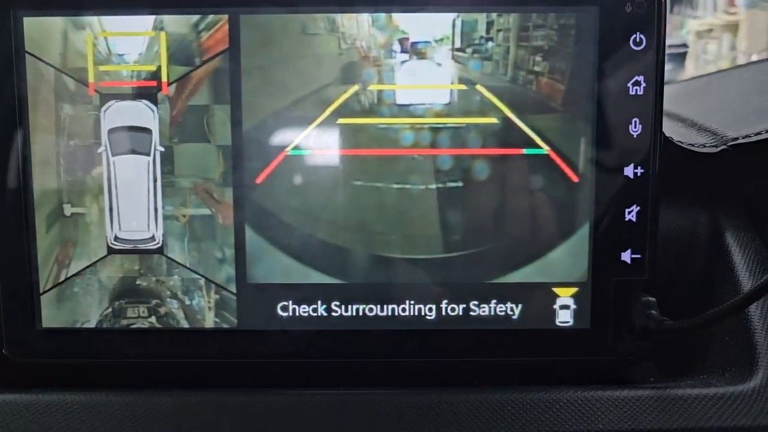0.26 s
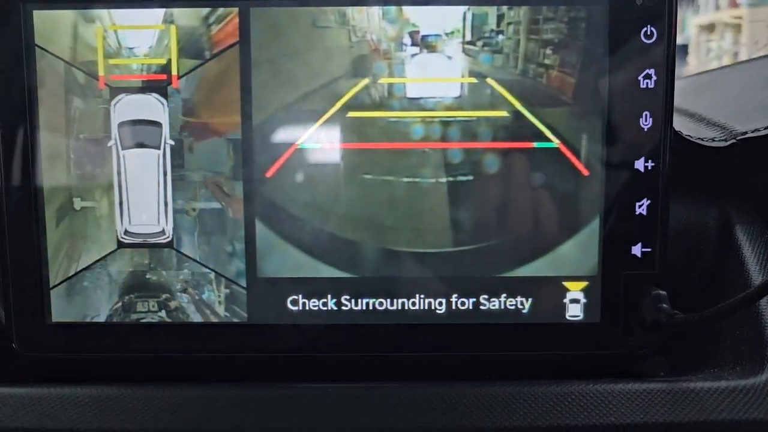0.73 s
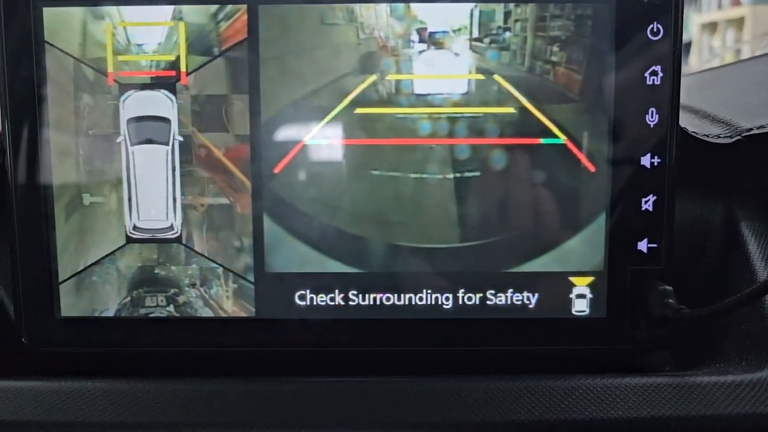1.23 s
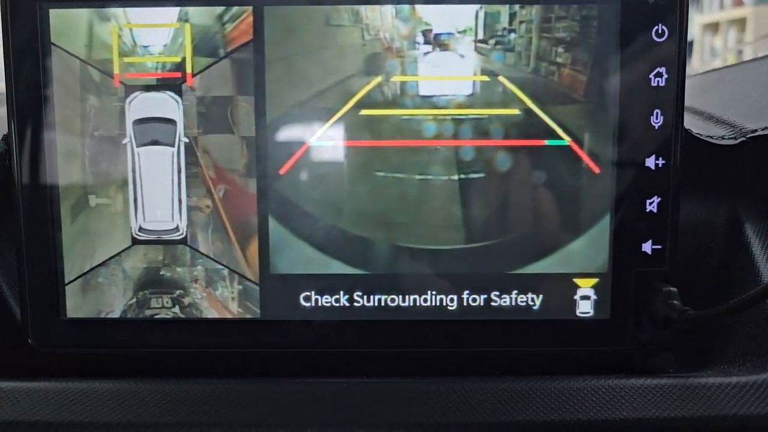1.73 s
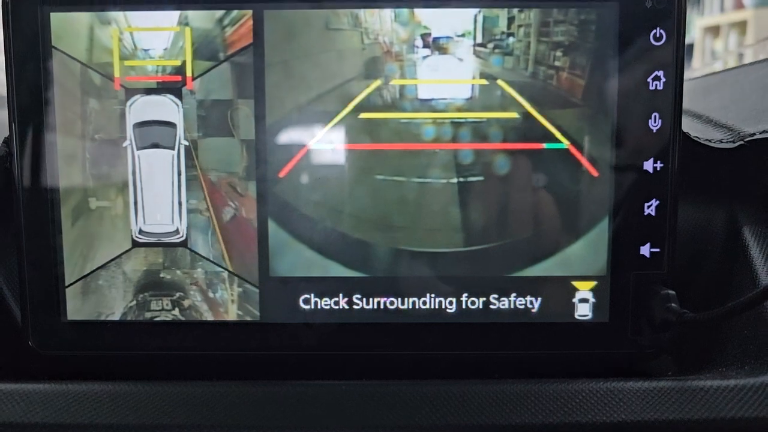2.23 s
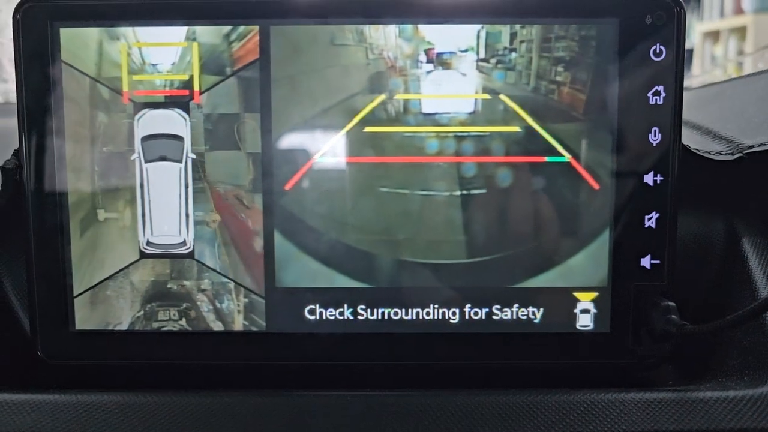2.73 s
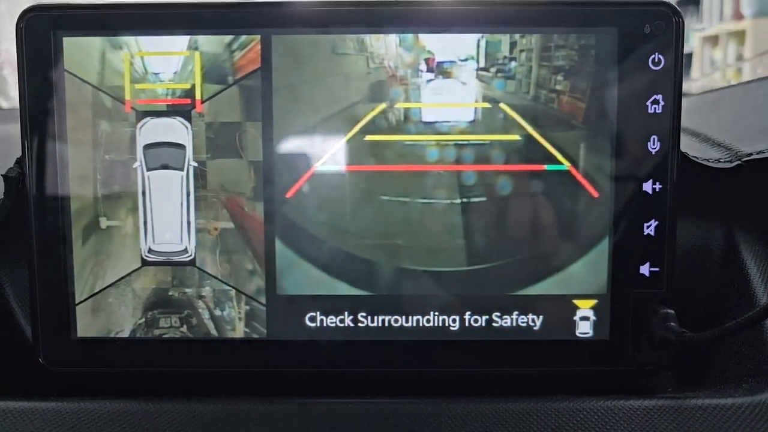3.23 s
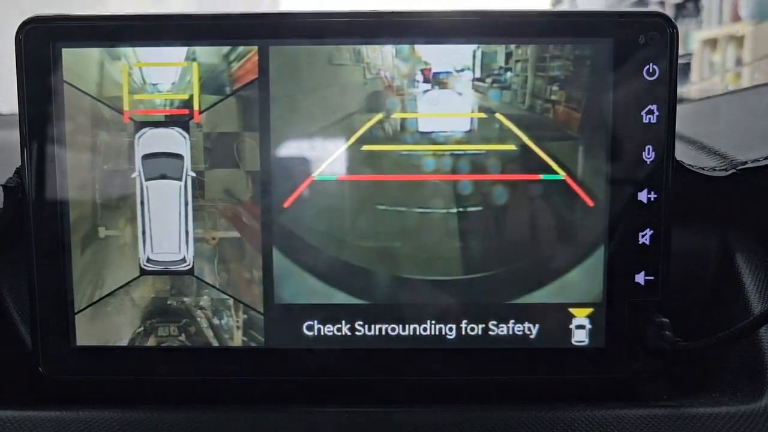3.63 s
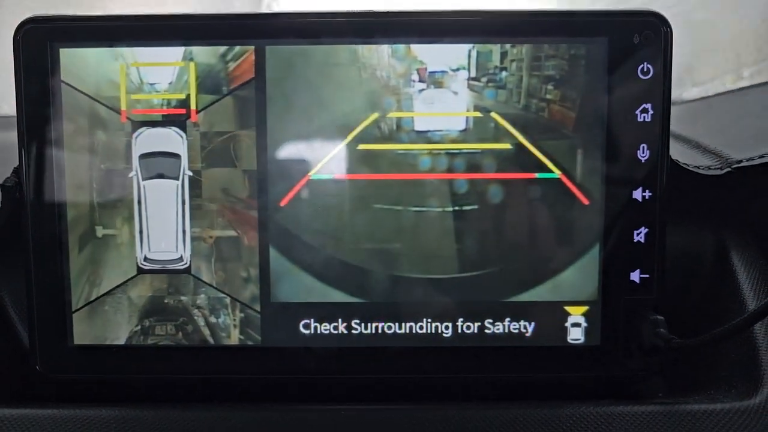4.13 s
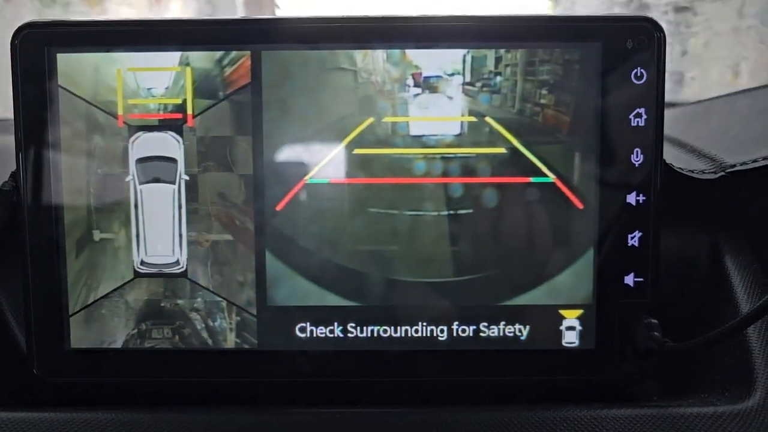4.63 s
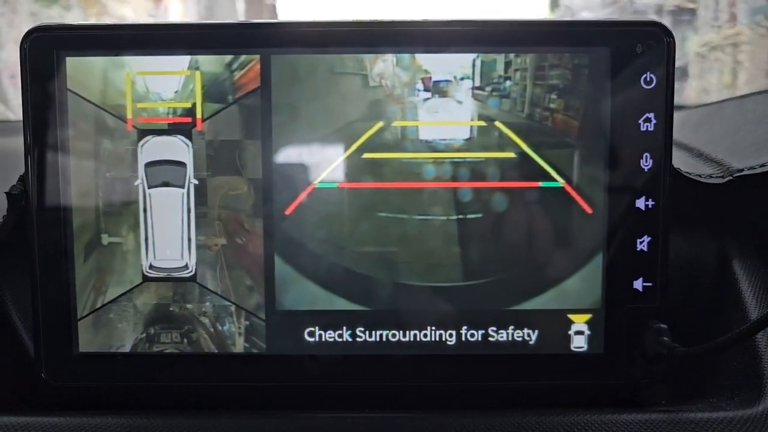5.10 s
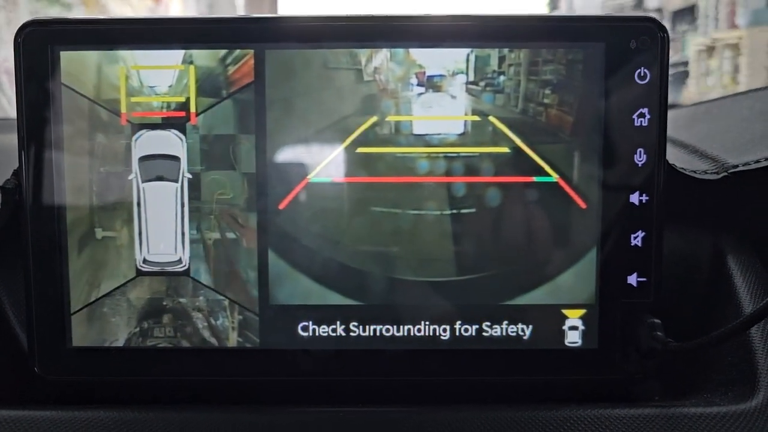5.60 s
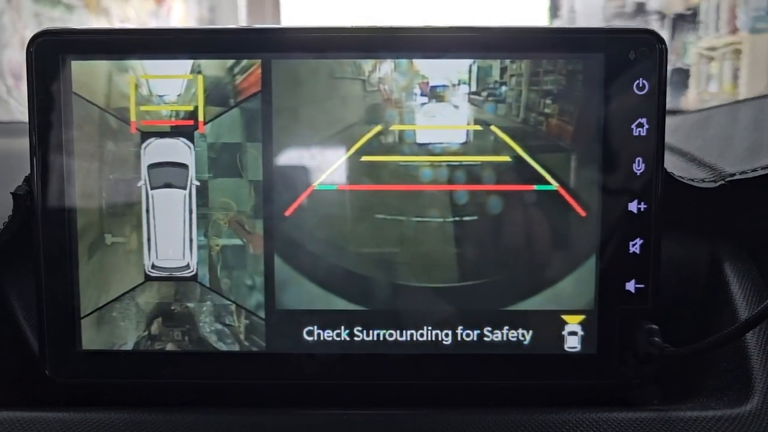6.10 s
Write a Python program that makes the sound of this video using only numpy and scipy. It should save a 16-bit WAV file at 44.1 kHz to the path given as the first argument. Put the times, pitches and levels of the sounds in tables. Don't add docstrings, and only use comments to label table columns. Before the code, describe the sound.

Low machinery rumble runs throughout under muffled, wet brush scrubbing heard from the car's interior. Overlapping rubs hiss through the glass and make body panels drum, with dull slaps and low air booms. There is a lull of around a second in the middle, then crisp wet window wiping, a firm drag over the pillar, and fuller scrubbing to the end. Close, enclosed stereo pickup.

```python
import sys
import numpy as np
from scipy import signal
from scipy.fft import rfft, irfft, next_fast_len
from scipy.io import wavfile
from scipy.ndimage import uniform_filter1d, map_coordinates

SR = 44100
rng = np.random.default_rng(int(sys.argv[2]) if len(sys.argv) > 2 else 0)


def how_loud(loudness_db):
    steps = np.asarray(loudness_db, float) / 20
    return 10 ** steps


def transcribe(u):
    v = np.clip(np.atleast_2d(u).T, -1, 1)
    q = np.round(v * 32767).astype(np.int16)
    wavfile.write(sys.argv[1], SR, q)


N = 280035


def unit(x):
    return x / np.sqrt(np.mean(x ** 2) + 1e-20)


def along(points, hz):
    f, v = np.transpose(points)
    return np.interp(np.log(hz + 1), np.log(f + 1), v)


def curves(rows):
    times, *columns = np.transpose(rows)
    return [np.interp(np.arange(N) / SR, times, column) for column in columns]


def wobble(rate):
    knots = rng.standard_normal(int(N * rate / SR) + 4)
    return map_coordinates(knots, [np.arange(N) * rate / SR])


def filtered(x, response):
    m = next_fast_len(N + SR // 2)
    return irfft(rfft(x, m) * response(np.fft.rfftfreq(m, 1 / SR)), m)[..., :N]


def modes(table):
    def response(f):
        total = 0
        for k, (hz, width, db) in enumerate(table):
            total = total + (-1) ** k * how_loud(db) * 1j * f * width / (hz * hz - f * f + 1j * f * width)
        return total
    return response


def bumps(peaks, f):
    return sum(db * np.exp(-(2 * (f - hz) / width) ** 2) for hz, width, db in peaks)


# pitch_hz, likeness (0 to 1)
LIKENESS = [(40, .9), (130, .92), (290, .86), (640, .72), (1100, .55), (1800, .35), (3500, .25),
            (15000, .22)]


def friction(slips, scatter_db, share):
    size = how_loud(scatter_db * rng.standard_normal((2, N))) * np.sign(rng.standard_normal((2, N)))
    grains = unit(size * (rng.random((2, N)) < slips / SR))
    pair = np.sqrt(share) * grains + np.sqrt(1 - share) * rng.standard_normal((2, N))

    def mid_and_side(hz):
        turn = np.arccos(np.clip(along(LIKENESS, hz), -1, 1)) / 2
        return np.array([np.cos(turn), np.sin(turn)])
    mid, side = filtered(pair, mid_and_side)
    return np.array([mid + side, mid - side])


def coloured(spectrum, force, peaks=()):
    return unit(filtered(force, lambda f: how_loud(along(spectrum, f) + bumps(peaks, f))))


def patchy(x, depth_db):
    z = signal.stft(x, nperseg=512)[2]
    field = uniform_filter1d(rng.standard_normal(z.shape[1:]), size=2, axis=0)
    field = uniform_filter1d(field, size=4, axis=1)
    return signal.istft(z * how_loud(depth_db * unit(field)), nperseg=512)[1][:, :N]


def contact(starts, holds, levels_db, rise, fall):
    steepen_s = 0.28
    t = np.arange(0, N + 64, 64) / SR
    early = np.maximum(starts[:, None] - t, 0)
    late = np.maximum(t - (starts + holds)[:, None], 0)
    build_db = rise * early * (1 + early / steepen_s)
    release_db = fall * late * (1 + late / steepen_s)
    each_db = levels_db[:, None] - build_db - release_db
    total_db = 10 * np.log10(np.sum(how_loud(2 * each_db), axis=0) + 1e-12)
    return np.interp(np.arange(N) / SR, t, total_db)


# pitch_hz, level_db (per Hz)
BRISTLE = [(500, -7.5), (900, -4.5), (1150, -5), (1400, -3), (2270, -7), (2600, -9.5), (4000, -9.5),
           (6900, -16.5), (8000, -17), (11000, -21), (16000, -24)]
# pitch_hz, width_hz, level_db
GLASS = [(1023, 70, 2.5), (1260, 50, 2.5), (1400, 70, 5), (1570, 70, 2.5), (1950, 110, 3), (2200, 55, 3.5),
         (2826, 60, 4), (3806, 50, 3), (7500, 500, 2.5)]


def bristle_hiss():
    slips = patchy(friction(slips=3000, scatter_db=4.5, share=0.39), depth_db=1.6)
    bristles = coloured(BRISTLE, slips, GLASS)
    sizzle = filtered(bristles, lambda f: 1 / (1 + (5500 / (f + 1)) ** 6))
    return bristles, sizzle


# pitch_hz, width_hz, level_db
DOOR = [(190, 21, -3.5), (260.3, 24.3, -2), (301.2, 17.5, -0.5), (350, 49.3, -4), (373.5, 46, -7),
        (480, 135, -12.5), (536, 55, -19.5), (654, 103, -13), (754, 75, -17.5)]
PILLAR = [(407, 41, -3.5), (474, 27, -7.5), (521, 44, 2.5), (598, 43, -9.5), (870, 32, -4.5),
          (1010, 83, -15)]
SIDE_GLASS = [(691, 66, 3.5), (855, 109, 0.5), (1055, 79, -5.5)]


def panel_drumming(flutter):
    force = how_loud(0.5 * flutter + 0.42 * wobble(35)) * friction(slips=500, scatter_db=5.5, share=0.28)
    return [unit(filtered(force, modes(panel))) for panel in (DOOR, PILLAR, SIDE_GLASS)]


# start_s (full contact), hold_s, hiss_db, drumming_over_hiss_db
STROKES = [(-.06, 0.036, -45, 7), (.15, .02, -52, 4), (.225, 0.036, -38, 17.5), (.31, 0.19, -32.5, 15),
           (.56, 0.041, -35, 4.5), (0.661, 0.058, -33, 14.5), (.88, 0.096, -45.5, 12),
           (1.02, 0.09, -34.5, 14), (1.16, 0.18, -37, 12.5), (1.431, 0.045, -37, 13),
           (1.632, 0.045, -39.5, 15.5), (1.72, 0.12, -41.5, 12.5), (1.95, 0.14, -49, 15),
           (2.17, 0.053, -38.5, 14), (2.281, 0.034, -34, 11.5), (2.42, 0.02, -40, 8.5),
           (2.5, 0.29, -49, 10), (2.871, 0.12, -42.5, 12.5), (4.076, 0.056, -50, 16.5),
           (4.2, 0.072, -66, 17), (4.36, 0.098, -49, 18.5), (4.51, 0.065, -44, 16), (4.68, .04, -37, 17),
           (4.8, 0.19, -46, 12.5), (5.06, 0.13, -41.5, 12.5), (5.21, 0.14, -39.5, 11.5),
           (5.481, 0.2, -32, 9.5), (5.79, 0.15, -34.5, 10), (5.99, 0.17, -33, 9.5), (6.22, .2, -34, 9.5)]
# time_s, place (0 door to 1 pillar), side_glass_db, left_minus_right_db
TRAVEL = [(0, 0.09, -14, 3.5), (.22, 0.21, -13, -1), (.5, 0.35, -12.5, -0.5), (.7, 0.49, -9, -0.5),
          (.8, 0.32, -11, -0.5), (1.3, 0.32, -9, -1), (2.3, 0.18, -11, -0.5), (3, .3, -11, -1),
          (4.1, 0.077, -6.5, -1.5), (4.6, 0.32, -8.5, -2), (5.1, 0.19, -10.5, -0.5), (5.5, 0.15, -8, -1),
          (5.65, 0.43, -4.5, -0.5), (5.9, 0.18, -5.5, -1), (6.35, 0.27, -2.5, -.5)]


def brushes():
    starts, holds, stroke_db, over_db = np.transpose(STROKES)
    hiss_db = contact(starts, holds, stroke_db, rise=130, fall=118)
    drum_db = contact(starts, holds, stroke_db + over_db, rise=160, fall=112)
    place, reach_db, pan_db = curves(TRAVEL)
    place = np.clip(place + 0.07 * wobble(12), 0, 1)
    flutter = wobble(20)

    bristles, sizzle = bristle_hiss()
    wet_db = np.minimum(0.15 * (-30 - hiss_db), 6)
    wet_bristles = bristles + (how_loud(wet_db) - 1) * sizzle
    swish = how_loud(hiss_db + 3.5 + 0.46 * flutter + 0.17 * wobble(33)) * wet_bristles

    door, pillar, side_glass = panel_drumming(flutter)
    panels = np.sqrt(1 - place) * door + np.sqrt(place) * pillar + how_loud(reach_db) * side_glass
    drum = how_loud(drum_db - 1.24) * panels
    return how_loud([pan_db / 2, -pan_db / 2]) * (swish + drum + rinse(sizzle) + hard_drag(pillar))


# start_s, hold_s, level_db
RINSE = [
    (-.05, 0.09, -44.5),
    (.11, 0.075, -43),
    (.79, 0.059, -43),
    (1.37, 0.063, -39),
    (6.28, 0.11, -42),
]


def rinse(sizzle):
    return how_loud(contact(*np.transpose(RINSE), rise=190, fall=310)) * unit(sizzle[::-1, ::-1])


# time_s, level_db
MACHINE = [(0, -12), (.12, -29), (.3, -23), (.5, -27.5), (.85, -20.5), (1.05, -22.5), (1.2, -26),
           (1.6, -20.5), (1.9, -24.5), (2.5, -25.5), (2.68, -24.5), (3.1, -21.5), (3.2, -28.5), (3.6, -26),
           (4.6, -23), (5.3, -23), (5.5, -24.5), (6.35, -26.5)]
# pitch_hz, level_db (per Hz)
RUMBLE = [(11, -38), (18, -9.5), (44, -1.5), (70, -6), (86, -8), (110, -35), (140, -52), (240, -120)]


def machinery():
    rumble_db = curves(MACHINE)[0]
    rumble = coloured(RUMBLE, friction(slips=32, scatter_db=3.5, share=0.099))
    return how_loud(rumble_db - 1.15) * rumble


# pitch_hz, level_db (per Hz)
HALL = [(65, -33), (110, 3.5), (150, -9), (220, -12.5), (320, -13), (360, -24), (520, -21), (900, -36.5),
        (1800, -42), (2650, -48.5), (3500, -44), (7600, -48.5), (8300, -52), (15800, -56.5)]


def wash_hall():
    hall = coloured(HALL, friction(slips=1800, scatter_db=2, share=0.052))
    hall[0] = filtered(hall[0], lambda f: how_loud(-5 / (1 + (f / 600) ** 4)))
    return hall * how_loud(-35.5 + 0.7 * wobble(6))


# start_s, peak_db, pitch_hz, fade_s (to fall 60 dB)
SLAPS = [(0.224, -8, 305, 0.16), (.36, -11, 303, 0.048), (.475, -6.5, 480, 0.045), (0.529, -17, 338, 0.21),
         (0.678, -6, 334, .05), (0.738, -5, 285, 0.1), (0.429, -8, 190, 0.063), (0.598, -16, 170, 0.28),
         (1.043, -9.5, 137, 0.15), (1.33, -15, 134, 0.17), (1.61, -21, 320, 0.15), (1.739, -9, 130, 0.082),
         (1.454, -0.5, 143.5, 0.045), (2.296, -14, 164, 0.14), (2.614, -14.5, 130, 0.082),
         (4.08, -5.5, 87, 0.05), (4.135, -40, 650, 0.026), (4.3, -20, 69.4, 0.14),
         (4.396, -0.5, 110, 0.024), (4.533, -12, 155, 0.083), (4.65, -19, 870, 0.092),
         (4.715, -11, 488, 0.08), (4.745, -4.5, 460, 0.037), (.852, -20, 61.3, .12),
         (2.805, -25, 330, 0.049), (5.055, -25, 510, 0.053), (5.43, -19, 305, 0.094),
         (5.537, -15, 307, 0.16), (5.565, -14, 145, .1), (5.81, -10.5, 298, 0.084)]


def slaps():
    out, t = np.zeros(N + SR), np.arange(SR // 3) / SR
    scuffs = signal.lfilter([0.12], [1, -0.88], rng.standard_normal((len(SLAPS), len(t))))
    for (start, db, hz, fade_s), scuff in zip(SLAPS, scuffs):
        fade = how_loud(-60 * t / fade_s)
        overtone = 0.2 * np.sin(2 * np.pi * 1.19 * hz * t) * fade
        ring = np.sin(2 * np.pi * hz * t) + overtone
        push = (1 - np.exp(-t * hz / 0.69)) * fade * ring
        rub = 0.4 * scuff * how_loud(-60 * t / 0.033) * (1 - np.exp(-t / 0.0029))
        out[round(start * SR):][:len(t)] += how_loud(db) * (push + rub)
    return out[:N]


# start_s, hold_s, level_db
LEANS = [(.25, 0.19, -23), (.58, 0.16, -24), (.97, .17, -20.5), (1.21, 0.055, -28), (1.311, 0.06, -16),
         (1.43, 0.11, -25.5), (1.65, 0.037, -25), (1.73, .11, -19.5), (1.9, .32, -24.5), (2.27, .04, -24),
         (2.36, 0.11, -25.5), (2.58, 0.037, -20.5), (2.72, 0.087, -17.5), (2.9, 0.021, -20),
         (2.98, 0.071, -23), (4.07, .37, -32), (4.53, 0.11, -19.5), (4.66, .1, -26), (4.8, 0.08, -18),
         (4.95, .35, -23.5), (5.37, 0.024, -20), (5.47, .14, -22), (5.66, 0.077, -17.5), (5.85, 0.1, -21.5),
         (6.04, 0.13, -24.5), (6.22, .15, -26)]
# pitch_hz, width_hz, level_db
AIR = [(110, 24.6, -4.5), (130, 22.4, -0.5), (170, 61.5, -5), (190, 87, -13.5)]


def cabin_boom():
    boom_db = contact(*np.transpose(LEANS), rise=90, fall=260)
    force = friction(slips=68, scatter_db=4.5, share=0.27)
    boom = unit(filtered(force, lambda f: modes(AIR)(f) ** 2))
    return how_loud(boom_db - 3) * boom


# start_s, hold_s, level_db, lower_hiss_db (relative)
WIPES = [(4.04, .03, -38.5, -10), (4.075, 0.021, -31, -7), (4.125, 0.034, -37, -8),
         (4.17, 0.13, -43.5, -5.5), (4.355, .045, -32, -6.5), (4.433, 0.014, -31, -6.5),
         (4.47, .03, -35, -2.5), (4.53, 0.067, -28, -2), (4.65, 0.067, -29.5, -9), (4.73, 0.042, -31, -14),
         (4.8, 0.031, -44, 2)]
# pitch_hz, level_db (per Hz)
WET_WINDOW = [(4400, -54), (5000, 3), (5300, 4), (7500, 3.5), (9500, 1.5), (11000, -3), (14500, -2.5),
              (16000, 6)]
HARD_PRESS = [(2000, -8.5), (2900, -0.5), (3500, -1.5), (4600, 0), (5300, -21), (6500, -20)]


def window():
    starts, holds, wipe_db, press_db = np.transpose(WIPES)
    wet_db = contact(starts, holds, wipe_db, rise=620, fall=230)
    hard_db = contact(starts, holds, wipe_db + press_db, rise=620, fall=230)
    wet = coloured(WET_WINDOW, patchy(friction(slips=5000, scatter_db=3, share=0.2), depth_db=1.3))
    hard = coloured(HARD_PRESS, friction(slips=3700, scatter_db=3, share=0.25))
    chatter_db = 0.9 * wobble(45)
    return how_loud(chatter_db) * (how_loud(wet_db) * wet + how_loud(hard_db - 4.5) * hard)


# start_s, hold_s, level_db
DRAG = [
    (4.655, 0.13, -31),
]


def hard_drag(pillar):
    return how_loud(contact(*np.transpose(DRAG), rise=390, fall=710)) * pillar


def scene():
    return brushes() + machinery() + wash_hall() + slaps() + cabin_boom() + window()


def roll_off(x):
    return signal.sosfilt(signal.butter(12, 16820, fs=SR, output="sos"), x)


# pitch_hz, left_minus_right_db
PORTS = [(40, -2), (90, -4.5), (140, 0.5), (400, 3.5), (1200, 0.5), (2400, 2), (4500, -0.5), (7000, 0),
         (15000, 7)]
# pitch_hz, width_hz, level_db
DUCTS = [
    [(10440, 370, -5.5)],
    [(8630, 1400, -8.5), (12550, 1000, -11)],
]


def record(dry):
    def openings(hz):
        tilt_db = np.array([[1], [-1]]) * along(PORTS, hz) / 2
        notch_db = [bumps(duct, hz) for duct in DUCTS]
        delay_s = np.array([[0.00016], [0]])
        return how_loud(tilt_db + notch_db) * np.exp(-2j * np.pi * hz * delay_s) * (hz < 15800)
    return roll_off(filtered(dry, openings))


dry = scene()
out = record(dry)
transcribe(out)
```